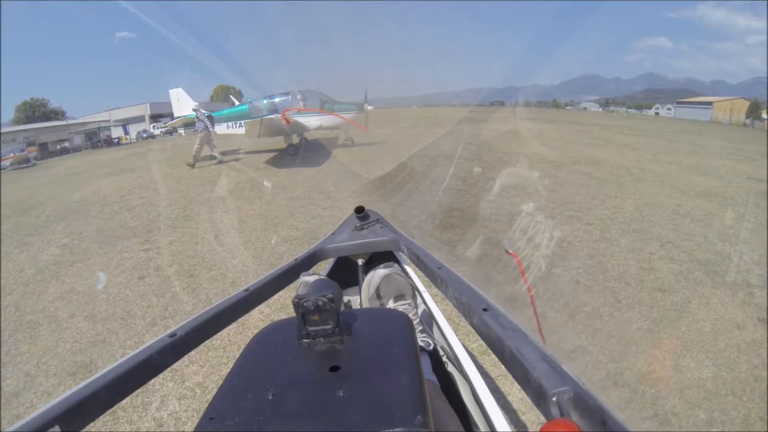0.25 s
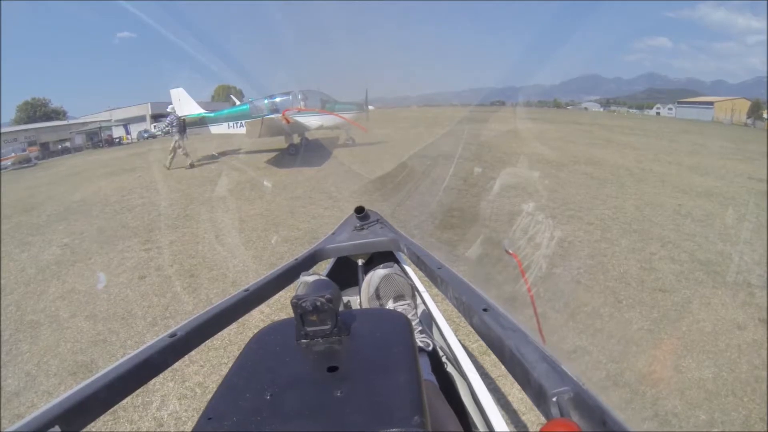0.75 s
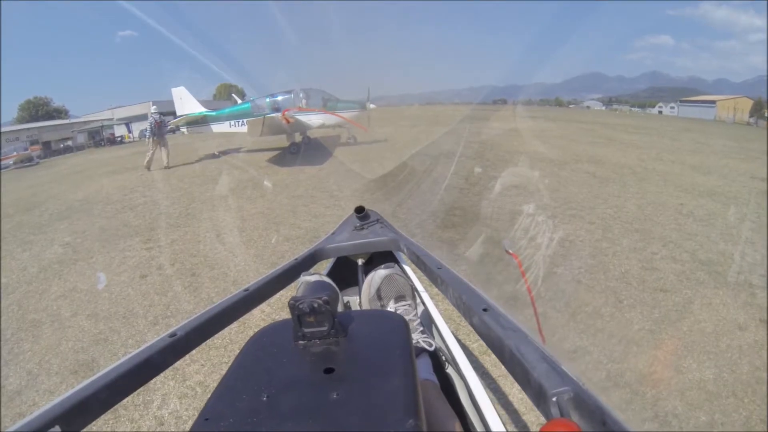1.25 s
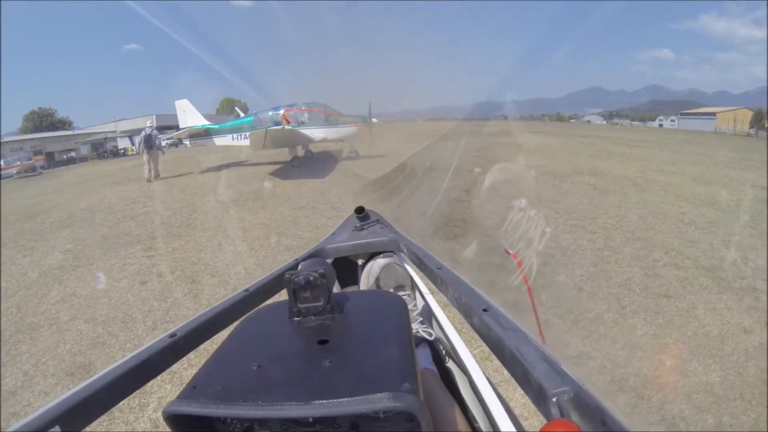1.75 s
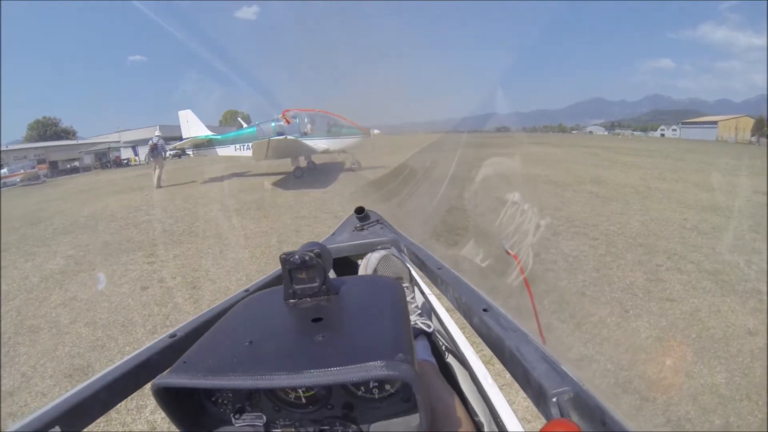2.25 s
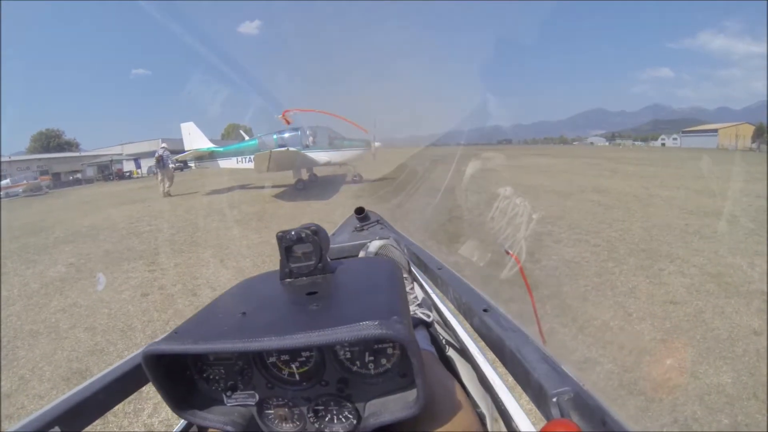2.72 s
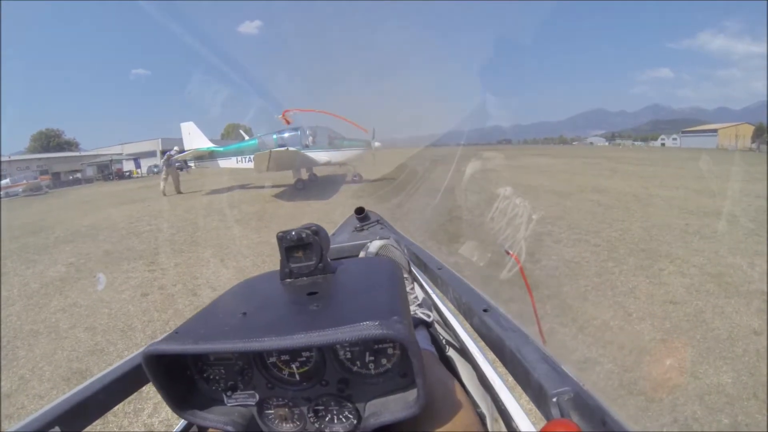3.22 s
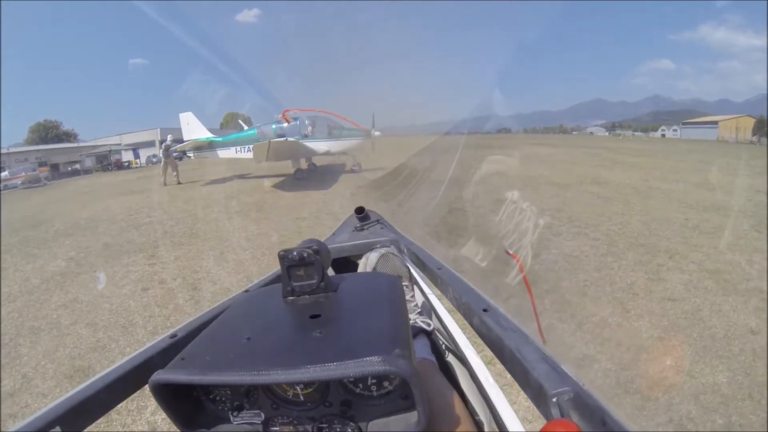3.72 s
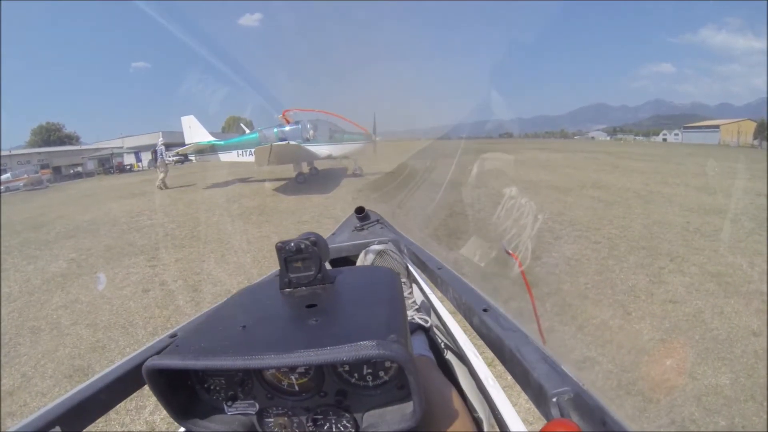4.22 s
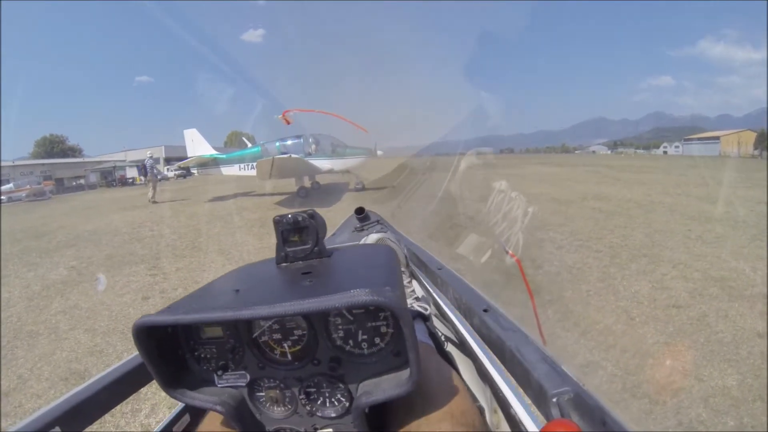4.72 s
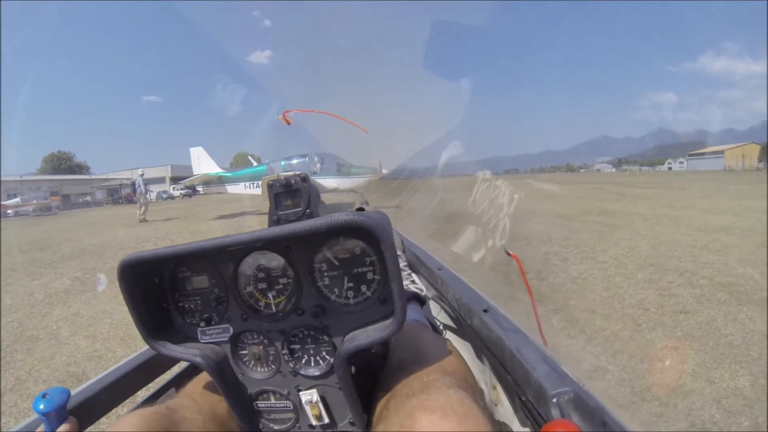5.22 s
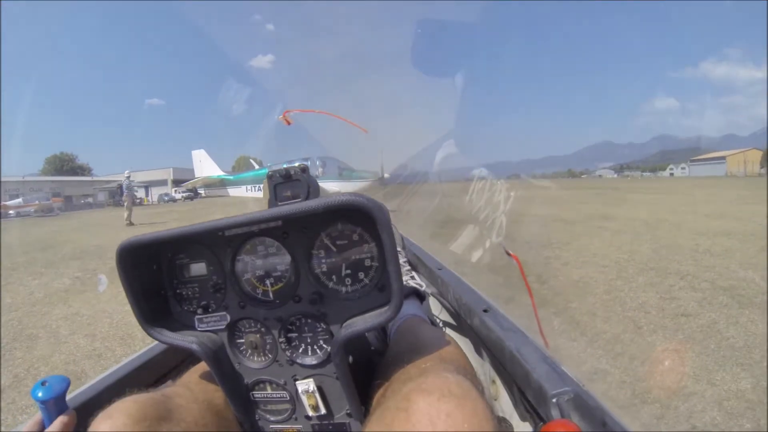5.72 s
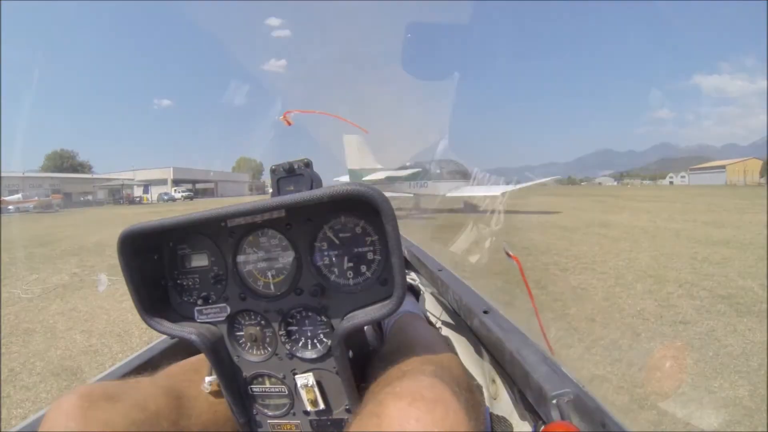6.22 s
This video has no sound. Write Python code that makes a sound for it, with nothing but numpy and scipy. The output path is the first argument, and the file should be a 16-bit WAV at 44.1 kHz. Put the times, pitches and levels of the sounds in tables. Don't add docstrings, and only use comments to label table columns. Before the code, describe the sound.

Close inside a closed glider cockpit on grass, a small tow plane idles steadily outside as a low throbbing hum with soft wash. Light knocks and ticking fittings come first, then a heavy cluster of hollow thumps and rubs near three seconds, a calmer stretch, and a last burst of jolts ending in the loudest slam, abruptly cut to silence.

```python
import sys
import numpy as np
from scipy import signal
from scipy.fft import rfft, irfft
from scipy.io import wavfile
from scipy.ndimage import uniform_filter1d

SR = 44100
rng = np.random.default_rng(int(sys.argv[2]) if len(sys.argv) > 2 else 0)


def pcm_store(signal):
    levels = np.round(np.clip(np.atleast_2d(signal), -1, 1) * 32767)
    wavfile.write(sys.argv[1], SR, levels.astype(np.int16).T)


def volts_from_decibels(level):
    exponent = np.asarray(level, float) / 20
    return 10 ** exponent


N = 285150

# time_s, level_db
SWAY = [(0.0, -27), (0.1, -27), (0.38, -32), (1.2, -40.5), (1.71, -46), (2.1, -39), (2.4, -39), (2.75, -38),
        (3.2, -45), (3.4, -39), (3.57, -39.5), (3.85, -35), (4.18, -34.5), (4.48, -41), (5.3, -47.5),
        (5.42, -36), (5.68, -57), (5.76, -37)]
SWAY_HZ = 13.35
# peak_s, level_db, pitch_hz, rise_s, fall_s (rise and fall span 20 dB)
BOOMS = [(0.72, -43, 42.8, .3, 0.15), (0.86, -32, 44, 0.11, 0.19), (1.237, -35.5, 46.83, 0.028, 0.28),
         (1.5, -37.5, 44.67, 0.046, 0.34), (1.61, -50, 48.33, 0.17, 0.053),
         (1.93, -44.5, 45.64, 0.32, 0.089), (2.004, -32, 40, 0.033, 0.064),
         (2.669, -19.5, 47, 0.051, 0.059), (2.83, -15.5, 42.8, .13, 0.086),
         (3.043, -26.5, 45.6, 0.12, 0.081), (3.134, -30.5, 47.04, 0.032, 0.044),
         (3.214, -26.5, 47.6, 0.035, 0.049), (3.289, -27.5, 48.54, 0.02, 0.018),
         (3.55, -22, 45.24, 0.074, 0.062), (3.655, -30.5, 47.96, 0.091, 0.03),
         (4.139, -36.5, 41.18, 0.26, 0.087), (5.163, -18.5, 45.59, 0.044, 0.062),
         (5.293, -21.5, 47.7, 0.061, 0.046), (5.357, -17.5, 45.72, 0.02, 0.02),
         (5.427, -25, 51.3, 0.035, 0.068), (5.517, -33, 46.9, 0.026, 0.074), (5.616, -34, 46.7, 0.11, 0.11),
         (5.739, -23.5, 46.75, 0.026, 0.019), (5.813, -14.5, 40.1, 0.037, 0.72)]
SLAM_S = 5.885
CUT_S = 5.9089
# start_s, peak_db, pitch_hz, swell_s
THUDS = [(0.692, -49, 195, 0.028), (1.048, -39, 112, 0.047), (2.639, -35, 205, 0.021),
         (2.652, -21.5, 89, 0.015), (5.7675, -19, 325, 0.0037), (5.785, -34, 201.2, 0.0071),
         (2.77, -24.5, 105.7, 0.014), (3.014, -19.5, 117.8, 0.021), (3.145, -26.5, 115, 0.02),
         (3.498, -43, 94.4, 0.045), (3.518, -34, 129.4, 0.014), (4.03, -33, 106.4, 0.034),
         (5.12, -22.5, 105.8, 0.023), (5.25, -24, 101.6, 0.011), (5.288, -41.5, 202.6, 0.047),
         (5.339, -45, 70.8, 0.013), (5.387, -22, 88.2, 0.0045), (5.428, -31, 86, 0.022),
         (5.521, -26, 107.1, 0.0099), (5.633, -41.5, 111.4, 0.039), (5.676, -25, 89.9, 0.01),
         (5.68, -28.5, 203, 0.0048), (5.74, -35, 111.7, 0.047), (5.789, -32.5, 77, 0.029),
         (5.881, -4.5, 55.98, 0.057), (0.101, -60, 270, 0.055), (0.19, -57.5, 380, 0.021),
         (0.578, -53, 269.4, 0.038), (0.771, -49.5, 270, 0.011), (0.85, -49.5, 358, 0.0088),
         (1.149, -49, 290, 0.0026), (1.2, -41.5, 278, 0.01), (1.238, -43.5, 286.5, 0.024),
         (1.393, -42.5, 308, 0.0038), (1.512, -42, 281, 0.0052), (5.124, -43, 269, 0.0089),
         (5.388, -35, 291, 0.0068), (5.39, -35, 215, 0.0067), (5.453, -44, 285, 0.014),
         (5.546, -50.5, 279.3, 0.045), (5.67, -46, 324.7, 0.008), (3.06, -35, 204, 0.0059),
         (3.092, -36, 274, 0.0066), (3.261, -46.5, 258, 0.0067), (5.278, -31, 277, 0.017),
         (5.312, -34, 275, 0.011), (5.352, -36.5, 290, .01), (5.8946, -22, 310, 0.0019),
         (0.914, -45, 221, 0.013), (1.08, -51.5, 200, .03)]
# start_s, peak_db, pitch_hz, swell_s
RINGS = [(0.6949, -40, 460, 0.0031), (0.6988, -42.5, 1033, 0.0032), (0.705, -52, 1040, 0.005),
         (0.9125, -47, 1760, 0.002), (0.9135, -45, 650, 0.0023), (1.025, -62.5, 2330, 0.0064),
         (1.185, -53.5, 790, 0.027), (1.264, -69, 2370, 0.0031), (1.595, -57, 790, 0.016),
         (2.632, -46, 1734, 0.0022), (2.684, -42, 640, 0.0032), (2.6845, -41, 1010, 0.0029),
         (2.6844, -52.5, 2260, 0.0028), (2.77, -37.5, 199, 0.019), (2.86, -62, 1146, 0.0089),
         (3.005, -45.5, 2300, 0.0048), (3.012, -38.5, 1000, 0.0061), (3.112, -54, 1750, .009),
         (3.052, -41, 1255, 0.0047), (3.165, -47, 1707, 0.0033), (5.374, -59, 1723, .006),
         (5.403, -56, 1746, 0.0055), (5.444, -60.5, 1760, 0.0099), (3.261, -42.5, 1783, 0.00096),
         (3.514, -39.5, 564, 0.0029), (3.518, -46.5, 784, 0.0071), (3.565, -54, 2050, 0.0022),
         (3.62, -51, 2135, 0.0026), (3.6212, -38.5, 1730, 0.003), (3.96, -56, 280, 0.046),
         (3.991, -59, 363, 0.033), (1.3647, -45.5, 1210, 0.00098), (1.3926, -44, 1110, 0.00099),
         (1.183, -55, 1740, 0.0024), (1.4495, -54, 840, 0.00086), (1.3155, -53, 855, 0.0011),
         (3.61, -54, 1740, 0.0036), (3.477, -61.5, 3260, 0.0032), (4.247, -66, 3630, 0.0036),
         (4.8345, -55.5, 1475, 0.0046), (4.8354, -52, 3330, .0007), (4.96, -65, 3790, 0.0028),
         (5.086, -51.5, 1690, 0.0021), (5.2506, -57, 2070, 0.0068), (5.2695, -50, 972, 0.011),
         (5.3258, -47, 938, .009), (5.4208, -64, 1740, 0.01), (5.7655, -38, 1680, 0.0015),
         (5.8873, -20.5, 1330, 0.0013), (5.8904, -27.5, 1109, 0.0018),
         (0.9116, -45, 1100, 0.0011), (1.1444, -55, 1443, 0.0011), (1.394, -49, 1809, 0.0015),
         (1.581, -53.5, 1730, 0.0041), (2.6922, -50, 1464, 0.0016), (2.7552, -49.5, 1770, 0.0012),
         (2.9945, -40, 1218, 0.001), (3.0117, -37, 2200, 0.0012), (3.0165, -29.5, 1240, 0.0015),
         (3.0239, -52.3, 2713, 0.0035), (3.0282, -44.5, 1340, 0.012), (3.037, -50, 1710, 0.0027),
         (3.07, -49.4, 1060, 0.0035), (3.0777, -46.1, 1350, 0.0026), (3.1111, -50, 1314, 0.0011),
         (3.1587, -42, 1220, 0.0023), (3.16, -52, 1701, 0.0051), (3.497, -47, 1644, 0.0012),
         (3.514, -49, 1680, 0.0011), (3.514, -58, 1730, 0.0046), (3.5395, -48, 1780, 0.0011),
         (3.561, -46, 1227, 0.0014), (3.568, -47.5, 1701, 0.003), (5.2477, -48, 1290, 0.0039),
         (5.248, -50, 1744, 0.0023), (5.2511, -43, 861, 0.0011), (5.265, -50, 1012, 0.0032),
         (5.2895, -52.8, 1701, 0.0011), (5.299, -49, 2046, 0.0011), (5.3342, -41, 926, 0.0013),
         (5.3478, -49, 890, 0.0011), (5.7669, -46, 1680, 0.0021), (5.7941, -56, 1315, 0.0032),
         (5.8253, -53.7, 1680, 0.002)]

# start_s, click_db, panel_db, brightest_panel_hz, click_tilt_db_per_octave
KNOCKS = [(0.6948, -35, -48.5, 264, -1), (0.729, -46, -47, 284, -4), (0.912, -31, -32, 334, -4.5),
          (2.633, -27.5, -22.5, 315, -7.5), (2.6815, -31, -40, 362, -1.5), (2.754, -34.5, -26.5, 293, -2),
          (2.795, -34.5, -28.5, 335, -7.5), (2.969, -47, -37, 344.3, -1), (2.994, -33, -33, 346, -6),
          (3.017, -44, -34.5, 370, -1), (3.135, -30, -26, 325, -1), (3.153, -52, -35, 277.6, -2),
          (3.476, -52, -43, 274.6, .5), (3.513, -36.5, -43.5, 365.5, -1), (3.6205, -33, -34, 320, 0),
          (5.239, -40, -58, 286.2, 3), (5.3, -37, -45, 380, 3), (5.315, -36, -43, 276.9, -1),
          (5.349, -53, -40, 283, 5), (5.419, -56, -59, 290, 11), (5.506, -53, -58, 290, 5),
          (5.575, -51, -59, 290, 8), (5.685, -65, -34.5, 265, 2), (5.7665, -35, -36.5, 281, 4),
          (5.892, -23.5, -31, 300, -1)]
# start_s, click_db
TICKS = [(0.106, -40), (0.964, -41.5), (1.088, -46), (1.144, -34.5), (1.188, -31), (1.2051, -37),
         (1.22, -38), (1.235, -38), (1.254, -43), (1.318, -46), (1.341, -53), (1.366, -33.5),
         (1.394, -33.5), (1.426, -35), (1.45, -37), (1.473, -44), (1.515, -54), (1.55, -43), (1.585, -39),
         (1.623, -36), (2.423, -40), (3.264, -36), (3.977, -46), (5.085, -60), (5.137, -43.5)]
TICK_PANEL_DB, TICK_PANEL_HZ, TICK_TILT_DB = -52.5, 290, 3
TICK_DAMPING = 1.3
CONTACT_S, TICK_CONTACT_S = 0.0013, 0.00035
PANEL_SWELL_S = 0.0058
# pitch_hz, level_db, t60_s
PANEL = [(195, -23.5, 0.092), (270, -0.5, 0.083), (285.9, -5, 0.24), (340, 7.5, 0.069), (382, 1.5, 0.11),
         (423, -10, .04)]
# pitch_hz, level_db, t60_s
FITTINGS = [(487, -15, .03), (604, 3, 0.036), (678, -4, 0.05), (790, 1.5, 0.054), (926, -4.5, 0.088),
            (1103, -1, 0.062), (1174, 0, 0.046), (1330, 0.5, 0.022), (1412, 9, 0.014), (1600, -3, 0.04),
            (1730, 3, 0.031), (1950, -7.5, 0.023), (2110, -4, 0.036), (2300, -29, 0.014),
            (2570, -20.5, .02), (2862, -19.5, .04)]

# start_s, length_s, creak_db, panel_db, brightest_hz
RUBS = [(1.044, 0.087, -61.5, -54.5, 1390), (1.146, 0.13, -61, -44, 820), (1.307, 0.21, -63.5, -59, 790),
        (1.508, 0.13, -63.5, -52, 1600), (2.632, 0.046, -65, -35, 1488), (2.694, 0.061, -66, -40, 900),
        (2.806, 0.067, -73, -45.5, 1097), (2.994, 0.031, -48, -34, 1290), (3.029, 0.0074, -36, -50, 1330),
        (3.041, 0.053, -51.5, -45.5, 1340), (3.102, 0.046, -55.5, -42, 1600),
        (3.146, 0.022, -51.5, -31.5, 1630), (3.21, 0.095, -67, -47, 1500), (3.471, 0.058, -61, -41, 1559),
        (3.524, 0.069, -58.5, -40, 1740), (5.239, 0.12, -51, -32.5, 990), (5.24, 0.055, -53.5, -59, 2900),
        (5.293, 0.03, -63, -47, 2730), (5.357, 0.094, -64.5, -49, 1712), (5.467, 0.057, -68, -54.5, 1500),
        (5.684, 0.13, -82, -54, 1495), (5.762, 0.044, -55, -34.5, 1470), (5.817, 0.073, -60, -46, 1530)]
RUB_RISE_S, RUB_FALL_S = 0.0028, 0.0062
# start_s, peak_db, decay_s
SNAPS = [(0.66, -60, 0.012), (0.6945, -66, 0.01), (1.026, -63, 0.008), (1.751, -61, 0.015),
         (1.876, -64, 0.0063), (1.996, -63, 0.0077), (2.368, -56, 0.008), (2.681, -56, 0.01),
         (2.855, -64, 0.0037), (2.996, -53.5, 0.0044), (3.009, -46, 0.01), (3.016, -54, 0.008),
         (3.6195, -53.5, 0.0063), (3.85, -59, 0.007), (4.098, -62, 0.0057), (4.219, -59.5, 0.014),
         (4.838, -59, 0.0075), (4.959, -66.5, 0.0054), (5.242, -63, 0.0071), (5.254, -69, 0.04),
         (5.2985, -68, 0.011), (5.3389, -65, 0.0056), (5.538, -59, 0.0049), (5.889, -39, 0.0053)]

# time_s, engine_cycles_hz
SPEED = [(0.0, 8.208), (0.45, 8.324), (0.75, 8.131), (1.1, 8.273), (1.6, 8.268), (1.95, 8.03), (2.3, 8.185),
         (2.95, 8.201), (3.45, 7.897), (3.8, 8.14), (4.8, 8.094), (5.3, 7.795), (6.0, 8.284)]
FIRST_TURN = -1.443
# multiple_of_cycle_rate, level_db
ORDERS_DB = [(5, -59), (7, -64), (8, -42.5), (9, -59), (10, -61.5), (11, -63), (12, -45), (13, -42.5),
             (14, -49.5), (15, -65.5), (16, -49), (17, -73.5), (18, -73), (19, -62), (20, -68.5), (21, -69),
             (27, -77.5), (23, -62), (24, -72.5), (32, -71.5), (40, -71), (44, -73.5)]
# time_s, level_db
CARRY = [(0.0, -1.7), (0.7, -1.7), (0.85, -6.5), (1.0, -2.5), (1.25, -3.5), (1.549, -1), (1.75, -0.5),
         (2.5, -1.5), (3.3, 0.3), (4.0, -0.5), (4.4, -1.2), (5.0, 0), (6.0, 1.3)]
# frequency_hz, level_db_per_hz
WASH = [(40, -8.5), (110, -2.5), (150, -25), (230, -19), (330, -18.5), (480, -28.5), (850, -36),
        (1200, -31.5), (1780, -36), (1980, -40), (3600, -45), (3900, -49.5), (11800, -54), (12900, -64)]
WASH_DB = -50
# frequency_hz, level_db_per_hz
SPIT = [(800, -10.5), (1500, 1.5), (2300, 9), (3400, 8), (5000, -5), (9000, -9.5), (14000, -26)]
SPIT_DB = -63
# frequency_hz, width_hz, boost_db
CABIN = [(256, 20, 5), (370, 13, 7.5), (502, 26, 7), (790, 19, 9.5), (996, 54, 8), (1140, 36, 6),
         (1475, 150, 5), (1730, 70, 3.5), (2384, 87, 7), (2854, 60, 7), (3350, 180, 6)]

# pitch_hz, level_db, share_of_picture_period
WHINES = [
    (5640, -77, .3),
    (11292, -83, .3),
    (13620, -90, 1.0),
]
PICTURES_PER_S, PICTURE_START_S = 23.976, 0.017
# start_s, length_s
WHINE_ON = [(.44, .08), (.59, .04), (.92, .28), (1.24, .07), (1.34, .16), (1.63, .09), (1.9, .14),
            (2.23, .08), (2.42, .34), (2.82, .08), (2.98, .29), (3.56, .16), (4.05, .07), (4.18, .18),
            (4.43, .15), (4.61, .04), (5.16, .05), (5.29, .22), (5.54, .055), (5.79, .11)]
# start_s, length_s
DROPOUTS = [(0.538, 0.0012), (0.601, 0.0013), (1.052, 0.0066), (1.269, 0.0016), (1.842, 0.0034),
            (2.132, 0.022), (2.366, 0.0015), (3.445, 0.0016), (4.435, 0.0013), (4.556, 0.0014),
            (4.646, 0.011), (4.772, 0.002), (4.902, 0.001), (5.06, 0.0017)]


def evened(x):
    return x / np.sqrt(np.mean(x ** 2) + 1e-20)


def follow(points, t):
    return np.interp(t, *np.transpose(points))


def read(points, hz):
    f, value = np.transpose(points)
    return np.interp(np.log(hz + 1), np.log(f + 1), value, right=value[-1] - 10)


def add(mix, start_s, sound):
    part = mix[round(start_s * SR):][:len(sound)]
    part += sound[:len(part)]


def drift(per_s):
    steps = rng.standard_normal(int(per_s * N / SR) + 2)
    places = np.linspace(0, len(steps) - 1, N)
    return evened(np.interp(places, np.arange(len(steps)), steps))


def coloured(points, patchy_db):
    frames, hz = N // 256 + 5, np.fft.rfftfreq(1024, 1 / SR)
    real, imag, patches = rng.standard_normal((frames, 513, 3)).T
    patches = uniform_filter1d(patches, size=10, axis=0)
    patches = evened(uniform_filter1d(patches, size=8, axis=1))
    spectrum = (real + 1j * imag) * volts_from_decibels(read(points, hz)[:, None] + patchy_db * patches)
    return evened(signal.istft(spectrum, nperseg=1024, noverlap=768)[1][:N])


def ringing(modes, bright_hz=1000, fall_db=0, flip=1, tilt_db=0):
    t = np.arange(SR // 5)[:, None] / SR
    hz, db, t60 = np.transpose(modes)
    octaves = np.log2(hz / bright_hz)
    db = db - fall_db * abs(octaves) + tilt_db * octaves
    waves = np.sin(2 * np.pi * hz * t) * flip ** np.arange(len(hz))
    ring = (volts_from_decibels(db - 60 * t / t60) * waves).sum(1)
    return ring / np.linalg.norm(ring)


def sway(t):
    return np.sqrt(2) * volts_from_decibels(follow(SWAY, t)) * np.cos(2 * np.pi * (SWAY_HZ * t - 0.1))


def boom(t):
    level = sum(volts_from_decibels(db - 20 * np.maximum((s - t) / rise, (t - s) / fall)) for s, db, hz, rise, fall in BOOMS)
    peak_s, _, pitch_hz = np.transpose(BOOMS)[:3]
    turns = np.cumsum(np.interp(t, peak_s, pitch_hz)) / SR + 0.013 * drift(1.8)
    until_slam = np.clip((SLAM_S - t) / 0.008 + 1, 0, 1)
    return np.sqrt(2) * level * until_slam * np.cos(2 * np.pi * turns)


def fuselage():
    t = np.arange(N) / SR
    out = sway(t) + boom(t)
    for s, db, hz, swell in THUDS + RINGS:
        u = np.arange(round(8 * swell * SR)) / SR
        shape = u / swell * np.exp(1 - u / swell)
        add(out, s, -volts_from_decibels(db) * shape * np.sin(2 * np.pi * hz * u))
    return out


def fitting_click(rough, contact_s, damping, tilt_db):
    u = np.arange(len(rough)) / SR / contact_s
    blow = 0.77 * (u == 0) + rough * u * np.exp(1 - u)
    fittings = np.array(FITTINGS) / [1, 1, damping]
    ring = ringing(fittings, 890.0, fall_db=-4.0, tilt_db=tilt_db)
    click = signal.fftconvolve(blow, np.convolve(ring, np.hanning(26)))
    return click / abs(click).max()


def panel_answer(bright_hz):
    panel = ringing(PANEL, bright_hz, fall_db=13.0, flip=-0.61)
    panel *= 1 - np.exp(-(np.arange(len(panel)) / SR / PANEL_SWELL_S) ** 2)
    return panel / abs(panel).max()


def knocks():
    out = np.zeros(N)
    blows = [(hit, CONTACT_S, 1) for hit in KNOCKS]
    for s, db in TICKS:
        hit = (s, db, TICK_PANEL_DB, TICK_PANEL_HZ, TICK_TILT_DB)
        blows.append((hit, TICK_CONTACT_S, TICK_DAMPING))
    roughs = rng.standard_normal((len(blows), 2000))
    for (hit, contact_s, damping), rough in zip(blows, roughs):
        s, click_db, panel_db, panel_hz, tilt_db = hit
        add(out, s + 0.00033, volts_from_decibels(click_db - 3.5) * fitting_click(rough, contact_s, damping, tilt_db))
        add(out, s + 0.0005, volts_from_decibels(panel_db + 4) * panel_answer(panel_hz))
    return out


def rubbing():
    out = np.zeros(N)
    happens = rng.random((2, N)) < 2500 / SR
    slips = rng.standard_normal((2, N)) * happens * volts_from_decibels(1.7 * drift(82.0))
    drum = evened(signal.oaconvolve(slips[1], ringing(PANEL, 300, fall_db=8.5))[:N])
    for s, length, creak_db, panel_db, hz in RUBS:
        near = slice(round((s - 0.06) * SR), round((s + length + 0.06) * SR))
        t = np.arange(near.start, near.stop) / SR
        padding = signal.butter(4, [560, max(1950, 1.25 * hz)], "band", fs=SR, output="sos")
        padded = signal.sosfilt(padding, slips[0, near])
        creak = evened(signal.fftconvolve(padded, ringing(FITTINGS, hz, fall_db=12.0))[:len(t)])
        rise = np.clip((t - s) / RUB_RISE_S + 0.5, 0, 1)
        fall = np.exp(-np.maximum(t - s - length, 0) / RUB_FALL_S)
        rub = volts_from_decibels(creak_db + 0.86) * creak + volts_from_decibels(panel_db - 6.5) * drum[near]
        add(out, near.start / SR, rise * fall * rub)
    return out


def snaps():
    t = np.arange(N) / SR
    shape = sum(volts_from_decibels(db) * (t > s) * np.exp(-abs(t - s) / decay) for s, db, decay in SNAPS)
    return uniform_filter1d(shape, size=40) * coloured(SPIT, patchy_db=1.5)


def exhaust_note(turns):
    hum = np.zeros(N)
    for order, db in ORDERS_DB:
        n = order - 12
        lag = 0.22 - 0.23 * n - 0.16 * n * (n - 1)
        level = np.sqrt(2) * volts_from_decibels(db + 0.89 * drift(6.0))
        hum += level * np.cos(2 * np.pi * (order * turns - lag + 0.03 * drift(3.3)))
    return volts_from_decibels(follow(CARRY, np.arange(N) / SR)) * hum


def cabin(x):
    hz = np.fft.rfftfreq(N, 1 / SR)
    boost_db = sum(db / (1 + (2 * (hz - f) / width) ** 2) for f, width, db in CABIN)
    return irfft(rfft(x) * volts_from_decibels(boost_db), N)


def propeller_wash(turns):
    cycle_db = 0.5 * np.cos(2 * np.pi * (turns - 0.05))
    firing_db = 1.4 * np.cos(2 * np.pi * (4 * turns - 0.1))
    throb_db = cycle_db + firing_db + 1.1 * drift(45.0)
    return volts_from_decibels(WASH_DB + throb_db) * cabin(coloured(WASH, patchy_db=1.5))


def exhaust_spit(turns):
    strength_db = rng.uniform(-5, 2, 64)[np.floor(turns + 0.03).astype(int) + 2]
    since = (turns + 0.011) % 1
    puff = (1 - np.exp(-since / 0.027)) * np.exp(-since / 0.11)
    return volts_from_decibels(SPIT_DB + strength_db) * puff * coloured(SPIT, patchy_db=3.0)


def tow_plane():
    turns = FIRST_TURN + np.cumsum(follow(SPEED, np.arange(N) / SR)) / SR
    return exhaust_note(turns) + propeller_wash(turns) + exhaust_spit(turns)


def electronics():
    t = np.arange(N) / SR
    place = (t - PICTURE_START_S) * PICTURES_PER_S % 1
    stretches = sum(abs(t - s - length / 2) < length / 2 for s, length in WHINE_ON)
    stretches = np.maximum(stretches, drift(60) > 2.3)
    flutter = stretches * volts_from_decibels(5 * drift(180)) * np.sign(drift(90))
    out = np.zeros(N)
    for hz, db, share in WHINES:
        gate = 1.0 * (place < share) if share < 1 else flutter
        out += volts_from_decibels(db) * uniform_filter1d(gate, size=130) * np.sin(2 * np.pi * hz * t)
    return out


def scene():
    return (fuselage() + knocks() + rubbing() + snaps() + tow_plane() + electronics())[None]


def band_limit(x):
    return signal.sosfilt(signal.butter(12, 16010, fs=SR, output="sos"), x)


def record(dry):
    t = np.arange(N) / SR
    highpass = signal.butter(4, 3600, "high", fs=SR, output="sos")
    treble = signal.sosfiltfilt(highpass, dry)
    lost = np.zeros(N)
    for s, length in DROPOUTS:
        gap = abs(t - s - length / 2 - 0.003) < length / 2 + 0.005
        lost += 0.93 * uniform_filter1d(1.0 * gap, size=120)
    mix = (dry - lost * treble) * (t < CUT_S)
    mix = signal.oaconvolve(mix, signal.firwin(511, 16150, fs=SR)[None], "same")
    return band_limit(mix)


dry = scene()
out = record(dry)
pcm_store(out)
```